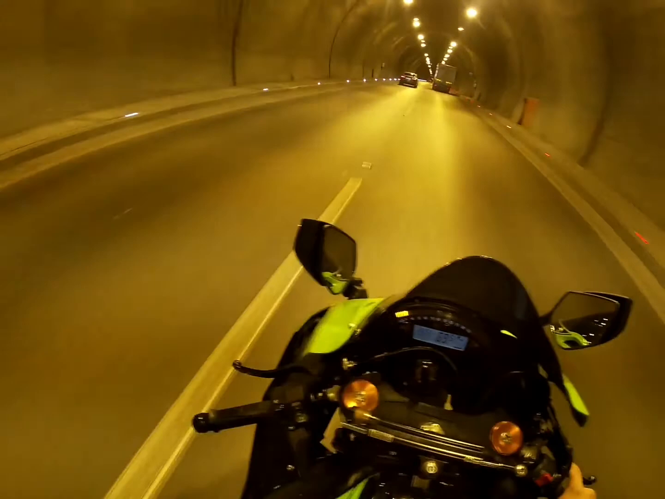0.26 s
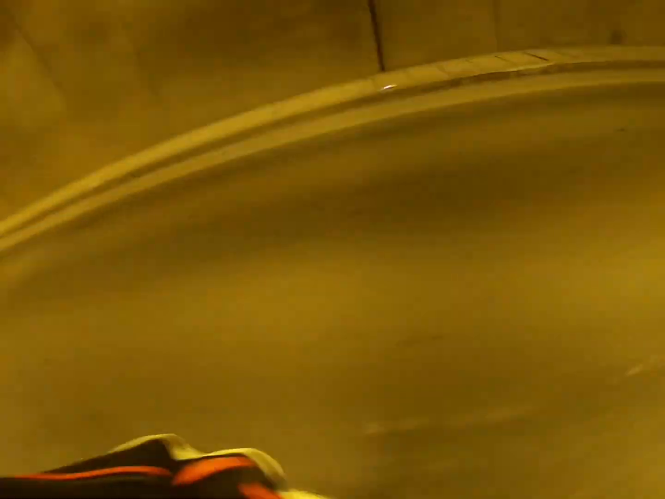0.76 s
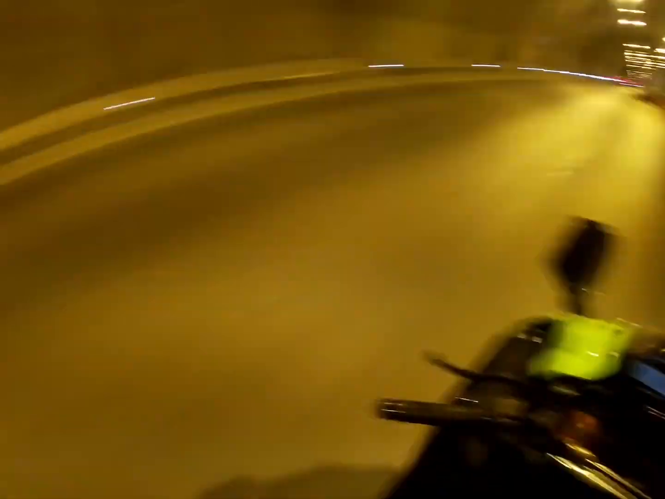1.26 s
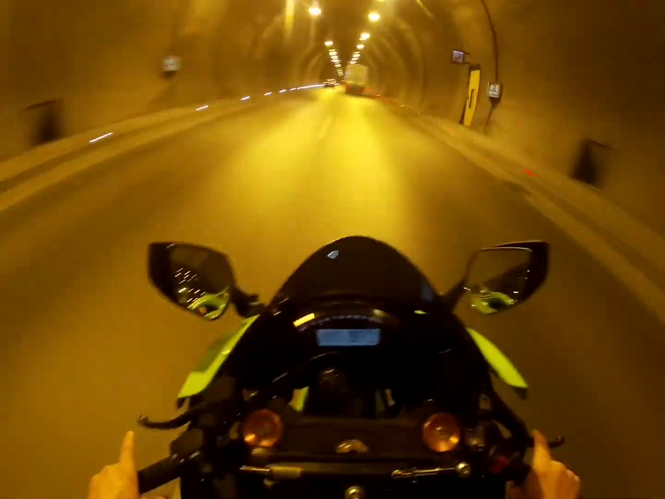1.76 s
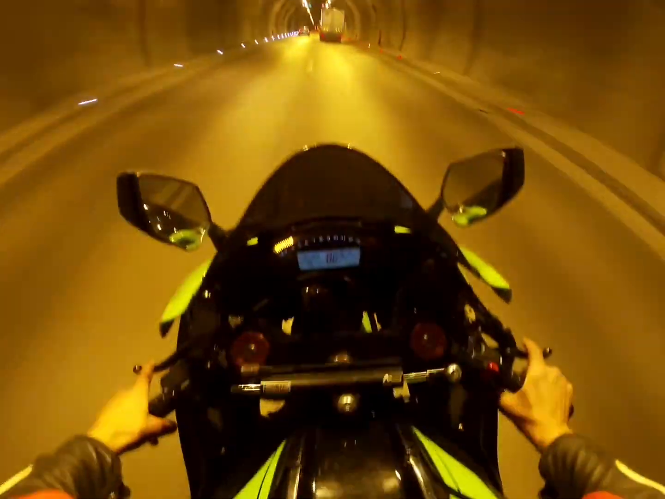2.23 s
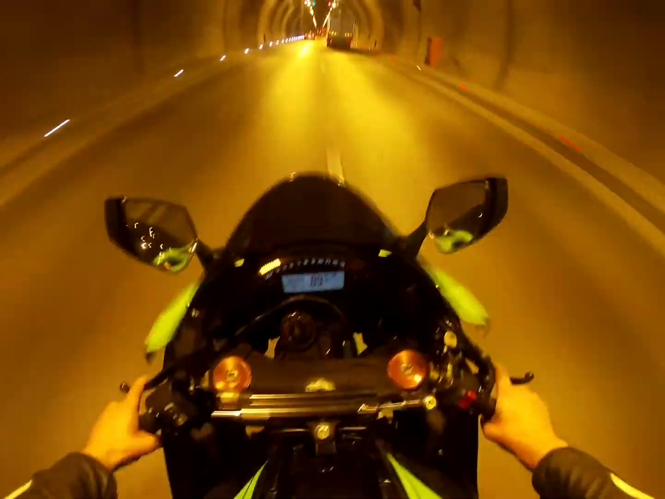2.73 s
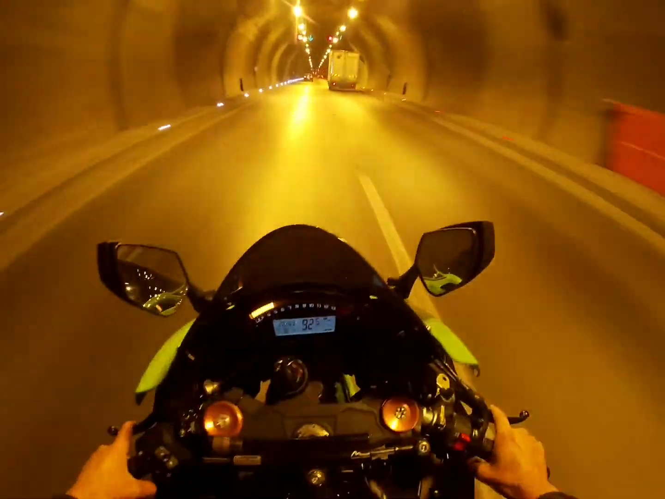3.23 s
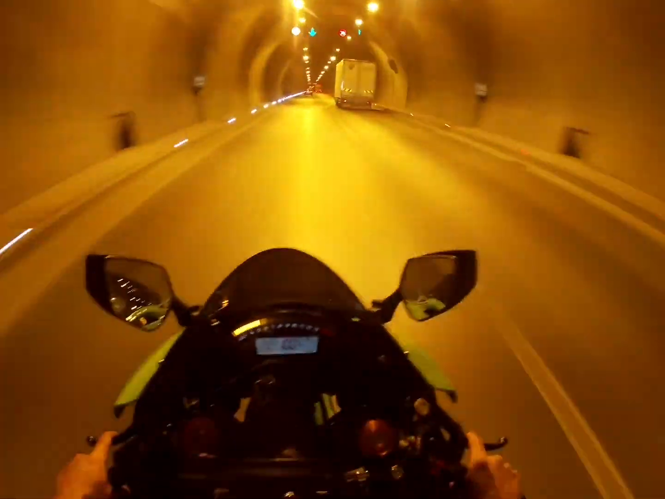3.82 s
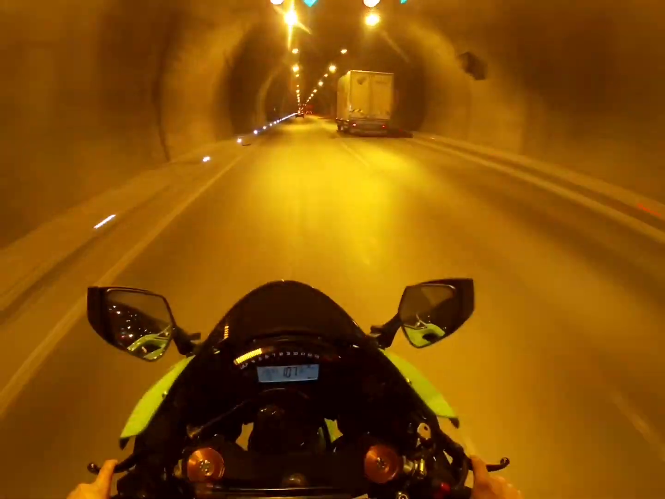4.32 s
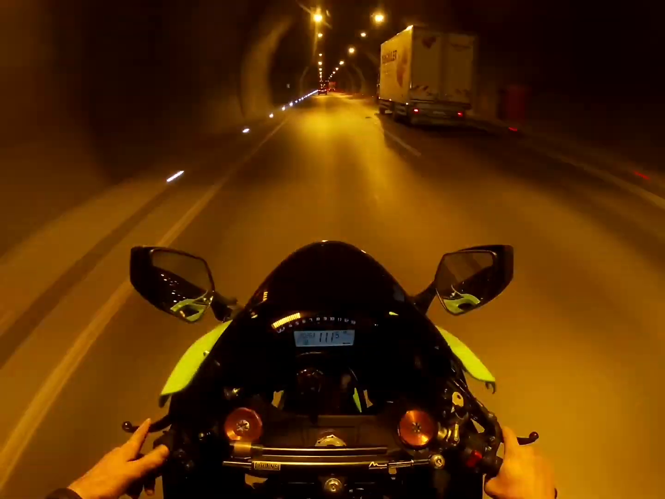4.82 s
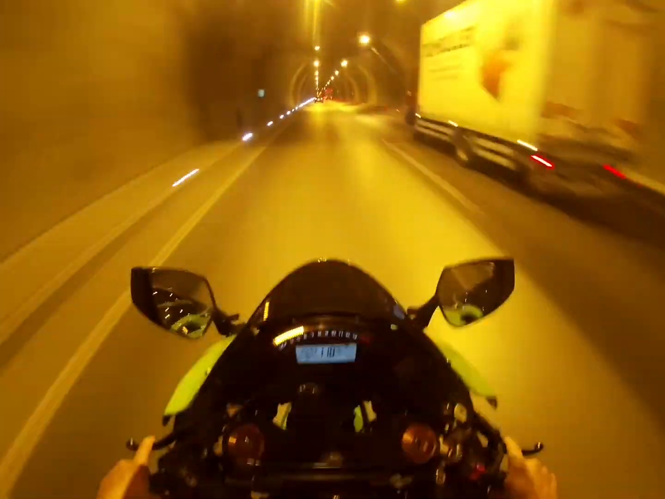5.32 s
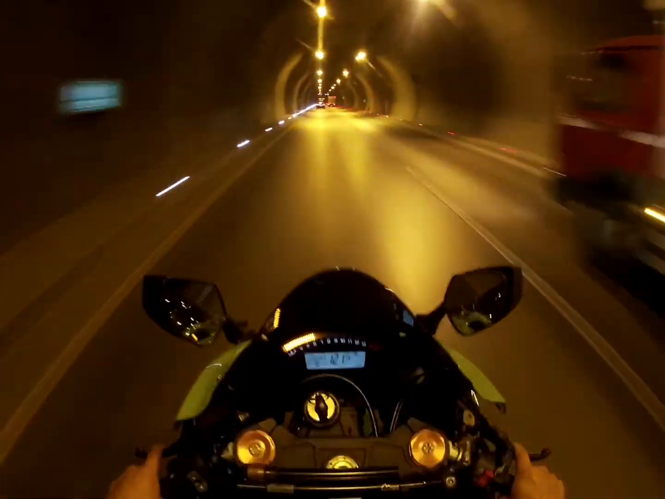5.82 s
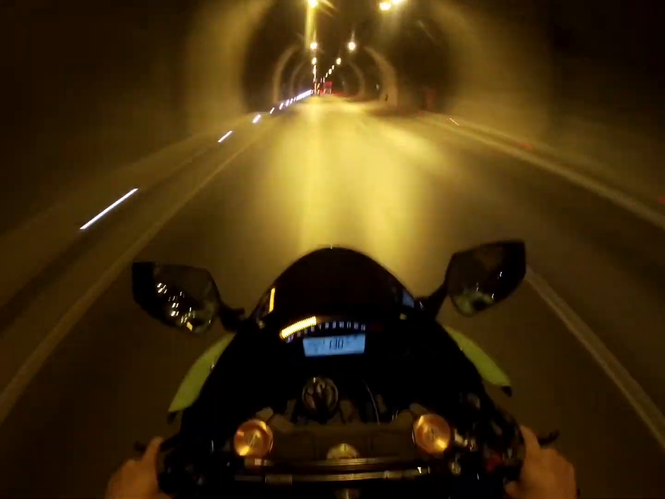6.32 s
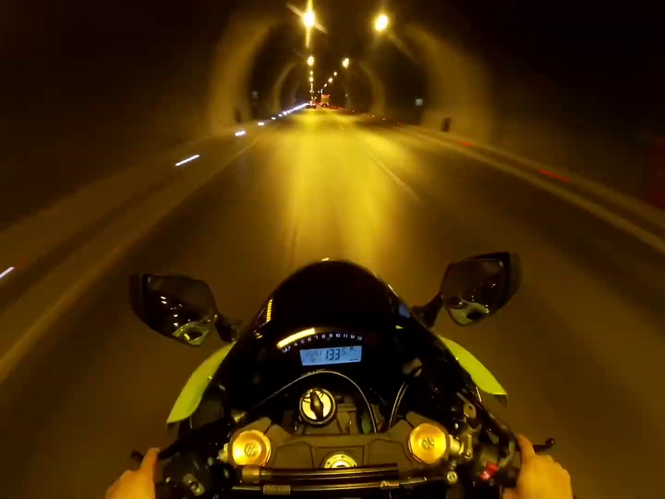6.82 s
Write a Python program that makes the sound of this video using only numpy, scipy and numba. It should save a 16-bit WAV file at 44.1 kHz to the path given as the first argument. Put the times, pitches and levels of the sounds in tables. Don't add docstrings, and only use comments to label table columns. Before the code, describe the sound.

Close helmet-camera sound of a four-cylinder sport motorcycle accelerating in one gear through a road tunnel, for about 7 seconds. At 0 s the engine is already pulling, a low-mid buzzing drone near 108 Hz with rich harmonics. From 0.4 to 1.6 s the head turns toward the tail pipe and the exhaust gets throatier, with more low growl. Pitch rises smoothly throughout, reaching about 145 Hz by 2.7 s and 223 Hz at the end. Tones dip, swell and beat with flatter wall echoes. Thin gear whine flickers between about 1.2 and 5.2 s. Wind buffeting thumps most around 2.4-4.6 s; air hiss and rough intake roar strengthen from 3.4 s, peaking near 4.6-4.8 s beside a lorry, then easing slightly. Tyre and tunnel rumble swell late. Level stays dense and even, cutting off at full howl.

```python
import sys
import numpy as np
from scipy import signal
from scipy.fft import rfft, irfft
from scipy.io import wavfile
from scipy.ndimage import uniform_filter1d
from numba import njit

SR = 44100
rng = np.random.default_rng(int(sys.argv[2]) if len(sys.argv) > 2 else 0)


def inscribe(sig):
    pcm = np.round(np.clip(np.atleast_2d(sig).T, -1, 1) * 32767)
    wavfile.write(sys.argv[1], SR, pcm.astype(np.int16))


def gain_from_db(level_db):
    decades = np.asarray(level_db, float) / 20
    return 10 ** decades


N = 311785


def level(x, db):
    return x * gain_from_db(db) / np.sqrt(np.mean(x ** 2))


def curve(table):
    s, value = np.transpose(table)
    return np.interp(np.arange(N) / SR, s, value)


def colour_db(table, hz):
    f, db = np.transpose(table)
    return np.interp(np.log(np.maximum(hz, 1)), np.log(f), db)


def bumps(table):
    s, length_s, *columns = np.transpose(table)
    coarse = np.arange(0, N, 64)
    phase = np.clip((coarse[:, None] / SR - s) / length_s, -.5, .5)
    shape = np.cos(np.pi * phase) ** 2
    return [np.interp(np.arange(N), coarse, shape @ c) for c in columns]


def walk(rate_hz):
    k = int(SR / rate_hz)
    held = np.repeat(rng.standard_normal(size=900), k)[:N + k]
    return 1.37 * uniform_filter1d(uniform_filter1d(held, k), k)[:N]


def turbulence(table, own_db, rate_hz, count):
    hz = np.fft.rfftfreq(N, 1 / SR)
    low_hz, high_hz = table[0][0], table[-1][0]
    inside = (hz > low_hz) * (hz < high_hz)
    shaped = rfft(rng.standard_normal(N)) * gain_from_db(colour_db(table, hz)) * inside
    place = np.log(np.maximum(hz, 1) / low_hz) / np.log(high_hz / low_hz) * (count - 1)
    total = np.zeros(N)
    for k in range(count):
        band = irfft(shaped * np.clip(1 - abs(place - k), 0, 1), N)
        total += band * gain_from_db(own_db * walk(rate_hz))
    return level(total, 0)


def wind(rush_db, head_db):
    # (frequency [Hz], density [dB per Hz])
    rumble_colour = [(47, -20.5), (80, -9), (140, 2.5), (176, -5.5), (222, 5.5), (280, -11.5), (400, -6.5),
                     (534, -14.5), (800, -25.5), (1040, -42.5), (1760, -120)]
    cavity_colour = [(50, -22), (59, -10), (65, 0), (71, -10), (84, -22)]
    buffet_colour = [(12, -17.5), (25, -1), (40, 3), (60, -11), (80, -9), (110, -12.5), (140, -28.5)]
    # (time [s], length [s], buffet level [dB], cavity hum level [dB])
    gusts = [(.35, 0.94, -2, 3), (.87, 0.13, 10, 2), (1.1, 0.15, -2, -3.5), (1.28, 0.14, 2, 5),
             (1.93, 0.14, -13, -6), (2.13, 0.25, 5, -18), (2.24, 0.11, 6, 2), (2.42, 0.19, 11.5, 13),
             (2.64, .16, 13, -3), (2.98, 0.14, 5, 6), (3.15, 0.15, 9, 11.5), (3.4, 0.86, 6, 5),
             (4.13, 0.11, 9, 1.5), (4.29, 0.062, -1, 14), (4.48, 0.16, 13.5, 8.5), (4.72, .3, 2, -2),
             (5.45, .3, 4.5, -1.5), (5.02, 0.13, 5, -11), (5.22, 0.072, 5, -5), (5.74, 0.086, 4, 10),
             (5.89, 0.12, 5, 2.5), (6.2, 0.58, -1, 4.5), (1.45, .12, -5, -5), (1.63, 0.088, 5, 5),
             (3.3, .12, 3.5, 7), (4.62, .15, 4, 3), (6.55, 0.24, -4, -1.5), (6.85, .2, -3, -0.5),
             (6.95, .25, -3, -10), (4.75, .15, 5, 5), (5.25, 0.089, 4, 4), (1.35, .2, -4, -6),
             (6.6, .08, 5, 8), (3.15, .4, -4, -3), (2.4, .2, -2, -3), (.2, .5, -3, -2)]
    # (time [s], length [s], level [dB])
    swells = [(.3, .3, -2), (1.9, .6, -4), (2.7, .3, 2), (3.9, .3, 3), (4.9, .3, -1.5), (5.45, .15, 3),
              (5.73, .12, 4), (6.05, .25, 5), (6.35, .2, 3), (6.6, .2, -1.5), (6.93, .35, 7)]
    rumble_db = -20 + 0.52 * rush_db + 0.34 * head_db
    rumble = turbulence(rumble_colour, own_db=-1.0, rate_hz=6.6, count=6) * gain_from_db(rumble_db)
    deep = signal.sosfiltfilt(signal.butter(2, 240, fs=SR, output="sos"), rumble)
    rumble = rumble + (gain_from_db(bumps(swells)[0]) - 1) * deep

    gust_buffet_db, gust_hum_db = bumps(gusts)
    sag_db_per_s = 0.37
    hum_db = -23.5 + gust_hum_db - sag_db_per_s * np.arange(N) / SR + walk(4.5)
    hum = turbulence(cavity_colour, own_db=1, rate_hz=12, count=2) * gain_from_db(hum_db)
    buffet_db = -28 + gust_buffet_db + 1.5 * walk(7.9)
    buffet = turbulence(buffet_colour, own_db=1.5, rate_hz=6, count=4) * gain_from_db(buffet_db)
    return buffet + hum + rumble


def gear_whine(turn):
    # (start [s], end [s], teeth per firing, level against the hiss [dB])
    gears = [
        (1.2, 1.7, 41.1, -16),
        (1.15, 1.5, 35.8, -16),
        (1.95, 2.3, 35.7, -23),
        (2.2, 3.0, 35.7, -13.5),
        (2.25, 2.7, 30.1, -15),
        (3.02, 3.5, 29.7, -12.5),
        (3.1, 3.5, 35.7, -19),
        (3.9, 4.5, 29.9, -16),
        (5.0, 5.25, 29.9, -19),
    ]
    s, whine = np.arange(N) / SR, 0
    for start_s, end_s, teeth, db in gears:
        spell = np.clip(np.minimum(s - start_s, end_s - s) / .1, 0, 1)
        whine = whine + spell * gain_from_db(db - 2.5 + 2 * walk(20)) * np.sin(teeth * turn + 1.5 * walk(90))
    return whine


def hiss(turn, rush_level_db, whistle_db):
    # (frequency [Hz], density [dB per Hz])
    hiss_colour = [(1300, 0.5), (1500, 0.5), (2230, -6.5), (3500, -11), (4600, -14), (5300, -13.5),
                   (5940, -20), (6560, -29.5), (7100, -38.5), (8000, -45.5), (9500, -56)]
    whistle_colour = [(6300, -9), (7200, -5), (7900, -3), (8600, 0), (9200, -8), (10200, -11.5),
                      (11500, -14.5), (12700, -24)]
    # (time [s], length [s], level [dB])
    sheen = [(.45, .6, 2), (1.15, .3, 2), (1.75, .15, -6), (2.45, .2, 3), (2.75, .15, -3), (3.7, .2, -3),
             (4.15, .15, -2), (4.45, .15, 3), (4.85, .25, -4), (5.15, .1, 3), (5.25, .1, -3), (5.9, .7, -6),
             (6.45, .25, -4), (6.85, .15, -3)]
    whistle = gain_from_db(whistle_db) * turbulence(whistle_colour, own_db=1.5, rate_hz=16, count=3)
    top = signal.sosfiltfilt(signal.butter(4, 9500, "high", fs=SR, output="sos"), whistle)
    whistle = whistle + (gain_from_db(bumps(sheen)[0]) - 1) * top
    air = turbulence(hiss_colour, own_db=1.2, rate_hz=14, count=7) + whistle
    air = air * gain_from_db(.7 * walk(24)) * (1 + .1 * np.cos(turn))
    return gain_from_db(rush_level_db + 6.5) * (air + gear_whine(turn))


@njit
def walls(x, lags, gain, damp):
    line, soft, out = np.zeros((8, 8192)), np.zeros(8), np.zeros(len(x))
    for i in range(len(x)):
        total = 0.
        for k in range(8):
            soft[k] += (1 - damp) * (gain[k] * line[k, (i - lags[k]) & 8191] - soft[k])
            total += soft[k]
        out[i] = soft[0] - soft[3] + soft[5] - soft[6]
        for k in range(8):
            line[k, i & 8191] = x[i] + soft[k] - total / 4
    return out


def tunnel_ring(engine):
    t60_s = 0.77
    lags = rng.integers(2000, 8000, size=8)
    running = np.pad(engine, (SR, 0), mode="reflect")
    echo = walls(running, lags, gain_from_db(-60 * lags / SR / t60_s), .9)[SR:]
    return level(echo, -23)


def receding(hz, order_db):
    # (pitch drop [fraction per 200 Hz of firing rate], level [dB])
    wall_drops = [
        (0.045, -17),
        (0.075, -13),
        (0.111, -9.5),
        (.15, -11.5),
        (.2, -16),
        (0.269, -20),
        (-0.035, -17),
    ]
    reflected_db = [-2.5, -3.5, -3, -3.5]
    out = 0
    for drop, wall_db in wall_drops:
        turn = 2 * np.pi * np.cumsum(hz * (1 - drop * hz / 200)) / SR
        for k, db in enumerate(order_db):
            mean = uniform_filter1d(gain_from_db(db), size=SR // 3)
            wave = walk(14) * np.sin((k + 1) * turn) + walk(12) * np.cos((k + 1) * turn)
            out = out + mean * gain_from_db(wall_db + reflected_db[k]) * wave
    return out


def intake(turn, hz, roar_db, head_db):
    # (frequency [Hz], level [dB])
    airbox = [(60, -2.5), (250, -3), (400, -7), (500, -15), (620, -14.5), (850, -6), (1150, -12.5),
              (1300, -20), (1700, -34), (2500, -30.5)]
    # (frequency [Hz], density [dB per Hz])
    roar_colour = [(260, -28), (450, -21), (477, -4), (574, -2.5), (771, -6.5), (858, -3), (1130, -5),
                   (1440, -22.5), (2500, -50.5), (3250, -46.5), (5500, -120)]
    growl_colour = [(280, -9), (340, -4), (400, -2), (470, -1), (560, -16.5)]
    upper_orders = [.5, 1.5, 2.5, 3.5, 4.5, 5, 5.5, 6, 6.5, 7, 7.5, 8]
    # (time [s], length [s], level [dB])
    cross_half = [
        [(1.9, 0.55, -5), (5.3, 1.2, -4)],
        [(1.1, 3.2, -9.5), (2.2, 0.54, -3.5), (3.4, 0.55, 3), (5, 0.55, 9)],
        [(1.5, .5, -4.5), (2.1, 0.8, -2.5), (2.5, .5, -6), (1.33, .2, -10), (.15, .2, -7), (.78, .15, 4),
         (1.58, .12, 6), (4.25, .1, 5), (4.7, .3, -6), (3, .3, -4)],
        [(0.84, 1.5, 9.5), (0.15, 0.36, 4), (2.2, 1, 7.5), (8, 4.7, -5), (4.5, .7, -2.5), (5.2, .5, 7.5),
         (.8, .2, 3), (.35, .4, 4), (.97, .2, 8), (1.18, .1, -7), (1.6, .2, 6), (2.7, .4, 5), (3.7, .5, -5)],
        [(.3, 0.56, 11), (.7, .4, 3.5), (1.6, .5, -4), (2.8, .9, -4), (4.4, .5, -7), (5.9, .3, -4.5),
         (6.6, .9, 3.5)],
    ]
    cross_upper = [
        [(.25, 0.43, 6), (1.45, .4, -6), (1.9, .5, 1.5), (3, 1.1, -5), (4.1, 1.2, 2), (4.3, .3, -2.5),
         (6.35, 0.55, -5.5), (6.9, 0.47, 4.5), (3.6, 1.1, -6), (4.22, .1, 4), (4.45, .25, -7), (5.4, .3, -4)],
        [(.4, .8, 4), (2.1, 1, 4), (3.3, 0.59, 2.5), (3.75, .3, -1), (4.7, 0.93, -8.5), (5.8, 0.68, -13.5),
         (6.5, 1.4, -3.5)],
        [(.5, .6, -2.5), (1, 0.57, 9.5), (1.9, 0.9, -11.5), (3.2, 2.1, 1.5), (4.3, 1.3, -5), (5.05, 0.72, 7),
         (5.8, .6, -5), (6.5, 1.6, -9.5)],
        [(1.6, .6, -3.5), (2.1, 0.59, 6), (2.8, .7, -5), (3.5, 0.48, 9.5), (4.4, 1.2, 7), (6, 1.2, -4.5),
         (3.35, .3, 4), (3.85, .5, 6), (4.6, .4, -5)],
        [(.3, .8, -8), (1.4, 2.8, -8), (3.6, .6, -1.5), (4.1, .3, 1.5), (4.4, 0.45, -4.5), (5.3, .6, -3.5)],
        [(.8, 2.4, -13), (3.4, 0.61, 4.5), (4.2, .8, -6.5)],
        [(.3, .9, -9.5), (1.5, .8, -7), (2.5, 1.3, -2), (4.5, .6, -7)],
    ]
    crossings = {int(2 * order): rows for order, rows in zip(upper_orders, cross_half + cross_upper)}
    lines = 0
    for half in range(1, 25):
        if half in (2, 4, 6, 8):
            continue
        uneven_db = -2.5 * (half % 2)
        pipe_db = head_db * (1.15 if half < 11 else -.45)
        db = colour_db(airbox, hz * half / 2) + uneven_db + pipe_db + 2.4 * walk(11)
        if half in crossings:
            db = db + bumps(crossings[half])[0]
        phase = 2 * np.pi * rng.random() + .6 * walk(30)
        lines = lines + gain_from_db(db) * np.sin(turn * half / 2 + phase)
    growl = gain_from_db(1.44 * head_db - 7.0) * turbulence(growl_colour, own_db=0.5, rate_hz=6.5, count=3)
    gas = turbulence(roar_colour, own_db=-2.0, rate_hz=20, count=5) * (1 + 0.96 * np.cos(turn))
    return uniform_filter1d(gain_from_db(roar_db), size=SR // 16) * (gain_from_db(3) * lines + gain_from_db(-3.7) * gas + growl)


def orders(hz, head_db):
    # (frequency [Hz], level [dB])
    pipe = [(105, -18.5), (135, -12), (155, -15), (190, -11.5), (260, -8.5), (400, -11.5), (480, -16),
            (600, -31.5)]
    firing_db = [1, -4.5, -6, -6.5]
    facing = [-.2, -.4, 0.17, -0.24]
    # (time [s], length [s], level [dB])
    cross_1 = [(.25, 0.17, -13), (.4, 0.37, -4), (.66, 0.38, -1), (.95, 0.064, 4), (2.07, 0.073, -4),
               (2.16, .12, -0.5), (2.42, 0.16, -14.5), (2.58, 0.076, -14.5), (2.68, 0.072, -20),
               (3.42, .34, -14.5), (3.75, .5, 3.5), (6.2, 0.29, -2), (4.48, 0.087, -17), (4.8, 0.31, 5.5),
               (5.0, 0.12, -14.5), (5.21, 0.091, -16.5), (5.44, 0.036, -13), (5.6, 0.22, 5),
               (5.71, 0.043, -10.5), (5.9, 0.69, -7.5), (6.1, 0.29, -1.5), (6.05, 0.096, -13.5),
               (3.1, .3, -8.5), (6.57, 0.054, -5), (6.75, 0.057, -7.5), (6.89, 0.087, -16), (5.86, .06, -5),
               (6.42, .08, 4.5), (6.58, .05, -4), (6.84, .06, 5), (7.03, 0.066, 3.5), (7.066, .03, -11.5),
               (1.1, .15, 2), (.5, .15, -4.5), (.72, .1, -7), (.56, .07, -5), (.4, .08, 5), (2.14, .08, 5),
               (3.95, .12, 3), (5.8, .08, 6), (4.65, .1, 3), (1.3, .4, -1)]
    cross_2 = [(0.061, 0.16, 4.5), (.3, 0.11, -9), (.63, 0.23, -12), (.87, 0.06, -0.5), (1.031, 0.075, -13),
               (1.2, 0.21, -10.5), (1.62, 1, 3.5), (1.95, 0.16, 5.5), (6.2, 0.52, 2.5), (2.35, .5, -5.5),
               (2.67, 0.02, -1.5), (2.79, 0.073, -16), (3.3, 0.41, -9), (3.561, .06, -4),
               (3.791, 0.26, -18), (4.151, 0.19, -17), (4.551, .12, -11.5), (4.71, 0.13, -12.5),
               (5.001, 1, -4), (5.11, .06, -14), (5.62, 0.14, -3), (5.82, 0.36, 3.5), (6.661, 0.29, -10.5),
               (6.86, 0.15, 4), (7.029, .14, -4), (5.74, 0.066, 4), (5.9, .06, 3.5), (6.03, 0.065, 2.5),
               (6.38, 0.13, 2), (6.52, 0.14, 4.5), (0.719, .15, -6.5), (.14, 0.058, 1), (2.63, .2, 2),
               (1.65, .2, 2), (4.62, .15, 3), (3.72, .06, 6), (.17, .08, -6), (3.13, .08, -4),
               (2.1, .1, -3), (7.06, .04, -8), (5.95, .15, 2), (6.3, .2, 2), (4.35, .2, 2), (5, .15, 3)]
    cross_3 = [(.08, 0.19, -7), (.22, 0.5, -6), (.3, 0.18, -4.5), (0.681, 0.42, 1), (6.15, 0.73, 1.5),
               (.87, 0.078, -13.5), (1.3, .08, -7.5), (1.601, 0.049, -1), (1.921, 0.34, -8.5),
               (2.322, 0.068, -14), (2.75, 0.058, -10), (3.0, 0.28, -13.5), (3.329, 0.051, -12),
               (3.63, 0.11, -14), (3.88, 0.15, -21), (4.019, .14, 3), (4.77, 0.092, 11),
               (5.599, 0.87, -18.5), (6.931, .12, 13.5), (.42, .08, -4), (.6, 0.035, 1.5), (4.4, .5, -7),
               (5.2, 0.29, 3), (.72, .2, 3), (.3, .12, 5), (1.2, .1, 4), (1.64, .06, -5), (1.75, .06, -6),
               (4.15, .06, -8), (4.6, .2, -5), (3.78, .1, 4), (6.05, .35, 5), (6.7, .3, 4)]
    cross_4 = [(.06, 0.22, -21), (.27, 0.09, -2), (.48, 0.22, -13), (0.881, .16, 6.5), (1.198, 0.15, -10),
               (1.42, 0.54, 5), (1.75, .35, -7.5), (2.25, 1.7, -12), (3.25, 0.78, 11), (4.3, 1.1, 4),
               (5.8, 0.63, -12), (2.75, .5, 5.5), (3.9, .2, 7.5), (4.75, 0.39, 5), (6.3, .25, 6.5),
               (.5, .15, -6), (6.5, .15, -6), (.9, .3, 2), (1.1, .08, -5), (.68, .2, 4), (3.4, .08, 5),
               (3.2, .15, -3)]
    order_db = []
    for k, crossing in enumerate((cross_1, cross_2, cross_3, cross_4)):
        direct_db = colour_db(pipe, (k + 1) * hz) + firing_db[k] + facing[k] * head_db
        order_db.append(direct_db + bumps(crossing)[0] + 0.6 * walk(13))
    return order_db


def exhaust(turn, order_db):
    turn_rad_per_db = .06
    out = 0
    for k, db in enumerate(order_db):
        slip = (-1) ** k * turn_rad_per_db * np.cumsum(abs(np.gradient(db)))
        phase = 2 * np.pi * rng.random() + slip + 0.22 * walk(25)
        out = out + np.sqrt(2) * gain_from_db(db + 0.3 * walk(30)) * np.sin((k + 1) * turn + phase)
    return out


def scene():
    # (time [s], level [dB])
    air_rush = [(0, -49), (.3, -46.5), (.62, -44.5), (.74, -49), (1.05, -48), (1.2, -46), (2.5, -46.5),
                (3.38, -41), (3.85, -39), (4.42, -39.5), (4.62, -35), (4.85, -40), (5.25, -38.5),
                (5.57, -40.5), (5.76, -44.5), (6.3, -42.5), (6.7, -44), (7.07, -41.5)]
    # (time [s], level [dB])
    head_turn = [
        (0, 4.5),
        (.4, 6.5),
        (.8, 11),
        (1.2, 9.5),
        (1.6, 5),
        (3, 4),
        (4.8, -2.5),
        (5.5, 0.5),
        (7.07, -4.5),
    ]
    # (time [s], firing rate [Hz])
    revs = [(0, 107.8), (.3, 110.4), (.6, 113.8), (.8, 116.6), (1, 118.9), (1.3, 122.6), (1.9, 131.6),
            (2.2, 137.1), (2.7, 144.9), (3.2, 153.2), (3.8, 163.9), (4.3, 173), (4.9, 183.5), (5.5, 193.8),
            (6, 202.4), (6.5, 211.9), (7.07, 223.2)]
    # (time [s], length [s], level [dB])
    puffs = [(1.63, 0.071, 6), (1.87, .1, 4.5), (1.2, 0.047, -1), (5.54, 0.067, 1.5), (5.7, 0.036, 3),
             (5.95, 0.27, 0.5), (6.68, 0.13, 3), (2.1, .2, 1.5), (.95, 0.088, 1), (4.0, .12, -3),
             (3.75, .3, 1.5), (4.85, .2, 2.5), (2.7, .12, 2), (.12, .15, 2), (5.8, .3, 1.5),
             (2.87, .08, -2.5), (6.8, .1, 2), (2.46, 0.057, -5), (2.79, 0.066, 4), (2.98, 0.046, 1.5),
             (3.07, 0.036, -4), (3.78, 0.071, 3), (3.92, 0.079, 0), (4.46, 0.17, -2), (4.96, 0.059, 0),
             (5.85, 0.066, -0.5), (6.1, 0.063, 5.5), (6.2, 0.054, 0.5), (6.55, 0.1, -7), (3.12, .05, 3.5),
             (4.53, 0.055, -0.5), (.46, 0.042, -3), (3.36, 0.1, 2), (4.7, .06, 3), (6.93, 0.064, 0),
             (1.32, .08, 4), (1.48, .08, 3), (.6, .12, 2), (2.972, .014, 5), (4.57, .04, 2)]
    # (time [s], length [s], level [dB])
    shrieks = [(.05, 0.54, 6), (2.5, 0.37, -0.5), (2.7, .3, 1), (3.3, 0.19, 1), (4.2, .15, 1),
               (4.35, 0.16, 3), (4.53, .04, 4), (4.6, .04, 4), (4.7, .06, 3), (5.65, .5, 2), (6.25, .15, 4)]
    s = np.arange(N) / SR
    hz, head_db, air_db = curve(revs), curve(head_turn), curve(air_rush)
    hz = uniform_filter1d(hz, size=SR // 6, mode="nearest")
    hz = uniform_filter1d(hz, size=SR // 7, mode="nearest")
    turn = 2 * np.pi * np.cumsum(hz) / SR
    order_db = orders(hz, head_db)
    rush_db = air_db + 41.5
    puff_db = bumps(puffs)[0]

    lorry_s, near_s, clear_s, lorry_db = 4.8, 8.3, 0.071, 4
    roar_db = -28.5 + 0.73 * (rush_db + puff_db) - 0.13 * head_db
    roar_db = roar_db + np.interp(s - lorry_s, [-near_s, 0, clear_s], [0, lorry_db, 0])
    tuck_s, tuck_db = 4.55, -5.5
    whistle_db = -29.5 + bumps(shrieks)[0] + .2 * head_db - 0.097 * rush_db
    whistle_db = whistle_db + tuck_db * np.clip((s - tuck_s) / 0.101, 0, 1)

    air = wind(rush_db, head_db) + hiss(turn, air_db + puff_db, whistle_db)
    engine = intake(turn, hz, roar_db, head_db) + exhaust(turn, order_db)
    tunnel = tunnel_ring(engine) + receding(hz, order_db)
    return (air + tunnel + engine)[None]


@njit
def hold(x, top, ratio, attack, release):
    y, e = np.empty(len(x)), top
    for i in range(len(x)):
        a = abs(x[i])
        e += (a - e) * (attack if a > e else release)
        y[i] = x[i] * (1 + (e / top) ** 6) ** ((1 / ratio - 1) / 6)
    return y


def roll_off(x):
    return signal.sosfilt(signal.butter(12, 12750, fs=SR, output="sos"), x)


def record(dry):
    fade_in = np.minimum(np.arange(N) / 60, 1)
    x = hold(dry[0] * fade_in, 0.44, 1.74, 0.026, 0.00039)
    mix = (1.3 * np.tanh(x / 1.3))[None]
    return roll_off(mix)


dry = scene()
out = record(dry)
inscribe(out)
```